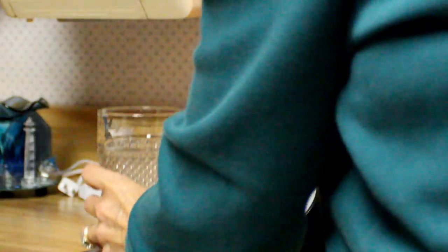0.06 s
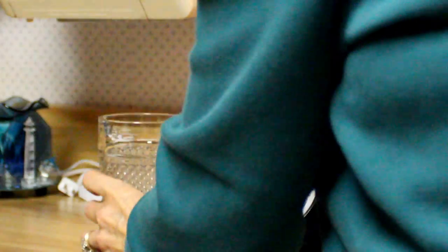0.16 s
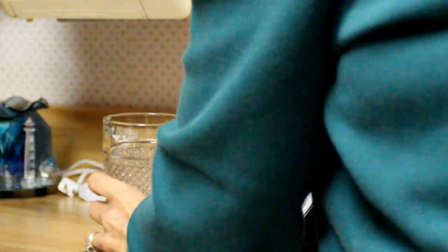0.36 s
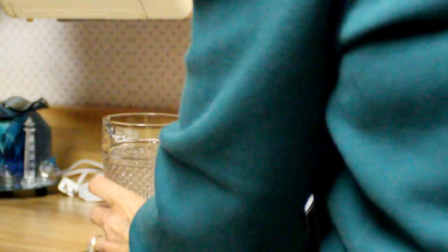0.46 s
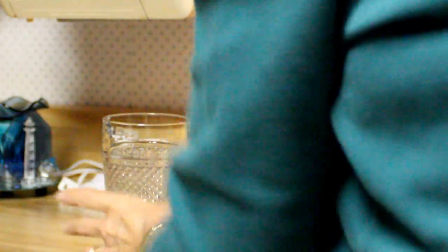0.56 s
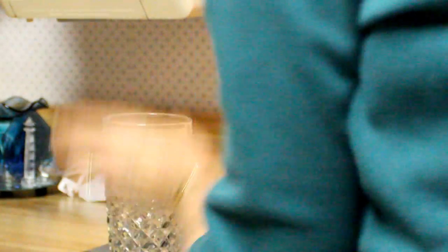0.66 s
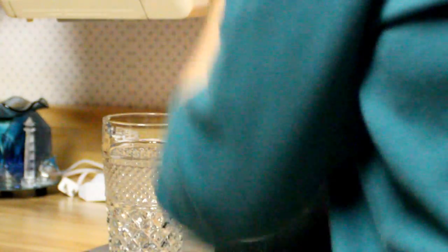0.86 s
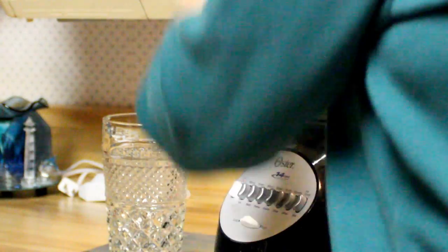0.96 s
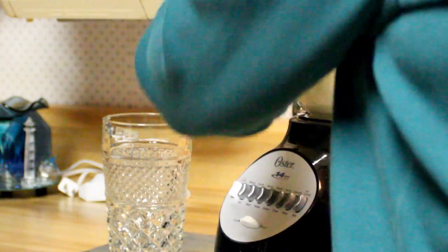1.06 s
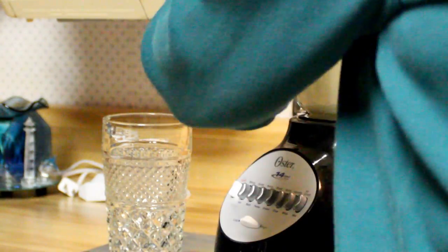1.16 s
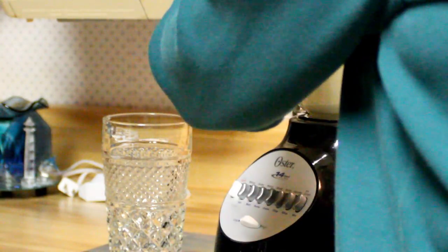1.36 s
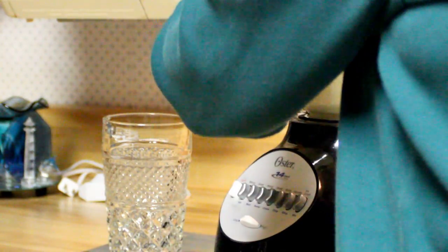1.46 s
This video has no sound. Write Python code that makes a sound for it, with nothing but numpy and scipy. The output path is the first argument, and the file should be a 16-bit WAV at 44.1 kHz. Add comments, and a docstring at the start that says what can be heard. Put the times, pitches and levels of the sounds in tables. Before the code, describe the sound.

A heavy glass tumbler knocks down on a wooden counter, hard and clattery, in a kitchen

```python
"""Kitchen, one microphone, 1.5 s: faint mains hum and converter hiss throughout, a sleeve brushing now and then.
At 0.23 s a heavy glass tumbler meets a wooden counter in quick touches: dying sines for glass and wood,
short noise for thud and crack. Dense noise echoes ring on from hard walls, the first after 1.5 m of extra path.
The camera's gain control dips after the knock and climbs back; from 0.41 s the base settles in a soft scuff
of random slips, with the hand's weight flexing the counter."""
import sys
import numpy as np
from scipy import signal
from scipy.io import wavfile
from scipy.ndimage import uniform_filter1d

SR = 44100
rng = np.random.default_rng(int(sys.argv[2]) if len(sys.argv) > 2 else 0)


def invert_db(x):
    """Field ratio 10**(x/20) for x, a level in decibels (scalar or array-like)."""
    u = np.asarray(x, float) / 20
    return 10 ** u


def inscribe(sig):
    """Save sig as 16-bit PCM at rate SR to the path in sys.argv[1].

    A 1-D sig is mono; a 2-D sig holds one channel per row.
    Samples are clipped to [-1, 1] before scaling.
    """
    pcm = np.round(np.clip(np.atleast_2d(sig).T, -1, 1) * 32767)
    wavfile.write(sys.argv[1], SR, pcm.astype(np.int16))


N = 66150

# touches of the base, edge first: [t/s, force level/dB, contact cut-off f/Hz]
TOUCHES = [(0.2333, -12, 2500), (0.2353, -2, 4000), (0.2393, -4, 6500), (0.2414, -3.5, 4400),
           (0.2445, -11.5, 3500), (0.2493, -8.5, 3500), (0.2525, -13.5, 3500), (0.288, -12, 2000)]
# glass and counter top ringing together: [f/Hz, relative level/dB, t60/s]
GLASS_AND_TOP_MODES = [(694, -7.5, 0.058), (826, -8, 0.059), (1040, -2.5, 0.059), (1150, -14, .05),
                       (1249, -10.5, 0.068), (1340.4, -3.5, 0.046), (1415, -8.5, 0.052), (1535, -1, .045),
                       (1791, -9.5, 0.12), (2020, -8, 0.072), (2158, -12, 0.12), (2306, -7.5, 0.043),
                       (2635, -10.5, 0.075), (2946, -8, 0.05), (3423, -11.5, 0.058), (3640, -13, 0.035),
                       (3928, -12.5, 0.043), (4410, -19, 0.1), (4620, -12, 0.059), (5210, -17.5, 0.046),
                       (5835, -32, 0.14), (6500, -29, 0.046), (8400, -42, .08)]
# counter and cabinet below: [f/Hz, relative level/dB, t60/s]
CABINET_MODES = [(56.2, -33.5, 0.45), (108, -22.5, .1), (157, -17, 0.06), (200, -34, .15),
                 (256.5, -20.5, 0.2), (326, -23, 0.23), (390, -24, .08), (435, -19, .15),
                 (525, -9.5, 0.033), (561, -18.5, 0.25)]
# thin ring of the glass wall: [f/Hz, relative level/dB, t60/s]
GLASS_WALL_MODES = [(804, -22.5, 0.5), (4608, -30, .3), (1030, -22, .3), (2030, -26, .3), (5230, -35, .3),
                    (5620, -28, 0.39), (5850, -38, .25), (7741, -39, .3), (8500, -43, .25)]
# scuff of the settling base: [t/s, force level/dB]
SETTLE = [(0.405, -62), (0.428, -44), (0.443, -33.5), (0.455, -42), (0.475, -54), (0.54, -62)]
# kitchen reverberation: [f/Hz, t60/s, relative level/dB]
KITCHEN = [(60, .6, -8.5), (149, 0.69, -4.5), (308, 0.68, 1), (600, 0.55, -4.5), (1200, 0.44, -6),
           (2500, .44, -5), (5000, 0.38, -6.5), (9000, 0.28, -7), (14400, 0.085, -19)]
# sleeve brushing as the arm moves: [t/s, level/dB]
SLEEVE = [(0.0, -75), (0.09, -64), (0.2, -66), (0.5, -75), (0.85, -70), (0.97, -61), (1.06, -68),
          (1.3, -75), (1.5, -70)]
# mains hum: [f/Hz, mean rms level/dB]
HUM = [(118.4, -68), (242.2, -79.5), (360.7, -71.5)]
# colour of the converter hiss: [f/Hz, relative level per Hz/dB]
HISS = [(15, -49), (25, -12), (90, -13), (103, -4.5), (124, -20), (149, -10), (194, -4), (331, -12),
        (443, -7), (862, -12.5), (1590, -13), (14500, -25)]

RING_DB = -5
CRACK_DB, CRACK_DECAY_S, CRACK_LOW_HZ, CRACK_HIGH_HZ = -29, 0.003, 5050, 9740
THUD_DB, THUD_DECAY_S, THUD_LOW_HZ, THUD_HIGH_HZ = -9.5, 0.0091, 300, 4000
SLIPS_PER_S, SLIP_CUT_HZ = 3000, 2800
PUSH_DB, PUSH_CUT_HZ = 18, 200
RING_ECHO_DB, THUD_ECHO_DB = -2.5, 4.5  # sent toward the walls
FIRST_ECHO_S, ECHO_BUILD_S = 0.0045, 0.006
HUM_WAVER_DB = 1.5
HISS_DB, HISS_TOP_HZ = -55, 14560  # rms level, upper edge
MIC_LOW_HZ, OVERLOAD = 44, 1.6  # bass roll-off, ceiling of the rounded peaks
LIMIT_DB, CUT_DB_PER_DB_OVER = -21, 0.62
REACT_S, SMOOTH_S, RECOVER_DB_PER_S = 0.02, 0.0023, 64.5


def soften(x, cut_hz):
    """Low-pass: a softer contact passes less treble."""
    sos = signal.butter(2, np.clip(cut_hz, 50, .45 * SR), fs=SR, output="sos")
    return signal.sosfilt(sos, x)


def noise_band(low_hz, high_hz, order=1):
    """White noise limited to one band."""
    sos = signal.butter(order, [low_hz, high_hz], "band", fs=SR, output="sos")
    return signal.sosfilt(sos, rng.standard_normal(N))


def ring(force, modes):
    """Every mode answers the force with a dying sine, signs alternating."""
    out = 0
    for k, (hz, level_db, t60) in enumerate(modes):
        radius = invert_db(-60 / (t60 * SR))
        angle = 2 * np.pi * hz / SR
        poles = [1, -2 * radius * np.cos(angle), radius * radius]
        mode = signal.lfilter([0, np.sin(angle)], poles, force + 1e-18)
        out = out + (-1) ** k * invert_db(level_db) * mode
    return out


def landing_force():
    """Each touch is an impulse of force, softened by its contact."""
    force = np.zeros(N)
    for start_s, force_db, cut_hz in TOUCHES:
        impulse = np.zeros(N)
        impulse[int(start_s * SR)] = 1
        force += invert_db(force_db) * soften(impulse, cut_hz)
    return force


def landing_crack():
    """Each touch adds a short bright burst of noise, louder for harder contacts."""
    t, level = np.arange(N) / SR, np.zeros(N)
    for start_s, force_db, cut_hz in TOUCHES:
        decay = (t >= start_s) * np.exp(-np.abs(t - start_s) / CRACK_DECAY_S)
        level += invert_db(force_db) * (cut_hz / CRACK_LOW_HZ) ** 2 * decay
    return invert_db(CRACK_DB) * level * soften(noise_band(CRACK_LOW_HZ, CRACK_HIGH_HZ), 15000.0)


def settling_slips():
    """The scuff: tiny random slips of the base against the wood."""
    s, level_db = np.transpose(SETTLE)
    envelope = invert_db(np.interp(np.arange(N) / SR, s, level_db, -120, -120))
    return (rng.random(N) < SLIPS_PER_S / SR) * rng.standard_normal(N) * envelope


def board_thud(force):
    """The board's many close modes: a broad thud that dies fast, different in each direction."""
    signs = rng.choice([-1, 1], N // 64 + 1)[np.arange(N) // 64]  # redrawn every 64 samples
    noise = soften(noise_band(THUD_LOW_HZ, THUD_HIGH_HZ), 5500.0)
    response = noise * np.exp(-np.arange(N) / SR / THUD_DECAY_S)
    return invert_db(THUD_DB) * signal.fftconvolve(force * signs, response)[:N]


def tumbler():
    """Touches and slips drive modes and four thuds; the hand's weight adds a low push while settling."""
    slips = settling_slips()
    force = landing_force() + soften(slips, SLIP_CUT_HZ)
    thuds = [board_thud(force) for _ in range(4)]
    push = invert_db(PUSH_DB) * soften(soften(slips, PUSH_CUT_HZ), PUSH_CUT_HZ)
    modes = ring(force, CABINET_MODES + GLASS_AND_TOP_MODES + GLASS_WALL_MODES)
    return invert_db(RING_DB) * modes + landing_crack() + push, thuds


def table(rows, hz, column):
    """Reads a column at a frequency, interpolating over log frequency."""
    rows = np.array(rows)
    return np.interp(np.log(hz), np.log(rows[:, 0]), rows[:, column])


def bands(count):
    """Half-octave noise bands, neighbours unrelated; yields (centre f/Hz, noise)."""
    edges = 22 * 2 ** (np.arange(count + 1) / 2)
    white = rng.standard_normal((2, N))
    for k, (low, high) in enumerate(zip(edges, edges[1:])):
        sos = signal.butter(2, [low, high], "band", fs=SR, output="sos")
        yield np.sqrt(low * high), signal.sosfilt(sos, white[k % 2])


def kitchen(x):
    """Dense echoes: noise that swells after the first reflection and dies band by band."""
    t = np.maximum(np.arange(N) / SR - FIRST_ECHO_S, 0)
    echoes = 0
    for hz, noise in bands(count=19):
        level_db = table(KITCHEN, hz, 2) - 60 * t / table(KITCHEN, hz, 1)
        echoes = echoes + noise * invert_db(level_db)
    swell = 1 - np.exp(-t / ECHO_BUILD_S)  # silent until the first echo
    return signal.fftconvolve(x, echoes * swell / np.sqrt(SR / 100))[:N]


def sleeve():
    """Soft cloth noise that comes and goes with the arm."""
    s, level_db = np.transpose(SLEEVE)
    cloth = noise_band(400.0, 3000.0, order=3)
    return invert_db(np.interp(np.arange(N) / SR, s, level_db)) * cloth / cloth.std()


def mains_hum():
    """Steady sines whose levels waver slowly."""
    t, hum = np.arange(N) / SR, 0
    for hz, level_db in HUM:
        waver = np.interp(t, np.arange(14) / 8, rng.standard_normal(14))  # a new value 8 times a second
        level = np.sqrt(2) * invert_db(level_db + HUM_WAVER_DB * waver)
        hum = hum + level * np.sin(2 * np.pi * (hz * t + rng.random()))
    return hum


def converter_hiss():
    """Steady coloured noise, cut steeply on top."""
    noise = sum(v * invert_db(table(HISS, hz, 1)) for hz, v in bands(count=19))
    noise = signal.sosfilt(signal.cheby2(16, 40, HISS_TOP_HZ, fs=SR, output="sos"), noise)
    return invert_db(HISS_DB) * noise / noise.std()


def gain_control(x):
    """Cuts the gain shortly after a loud sound and lets it climb back at a steady rate."""
    t = np.arange(N) / SR
    level_db = 10 * np.log10(uniform_filter1d(x ** 2, size=220) + 1e-12)
    wanted_db = CUT_DB_PER_DB_OVER * np.maximum(level_db - LIMIT_DB, 0)
    climb_db = RECOVER_DB_PER_S * t
    cut_db = np.maximum.accumulate(wanted_db + climb_db) - climb_db  # holds peaks, falls linearly
    late_cut_db = np.interp(t - REACT_S, t, cut_db)
    r = np.exp(-1 / (SMOOTH_S * SR))
    return x * invert_db(-signal.lfilter([1 - r], [1, -r], late_cut_db))


def scene():
    """At the microphone: one thud arrives direct, the other three by the walls only."""
    modes, thuds = tumbler()
    direct = modes + thuds[0]
    echoes = invert_db(RING_ECHO_DB) * kitchen(direct)
    echoes = echoes + invert_db(THUD_ECHO_DB) * sum(kitchen(v) for v in thuds[1:])
    return (direct + echoes + sleeve() + mains_hum())[None]


def top_cut(x):
    """Nothing passes above the cut-off."""
    return signal.sosfilt(signal.butter(12, 15610, fs=SR, output="sos"), x)


def record(dry):
    """Microphone bass roll-off, gain control, rounded peaks, then hiss."""
    mic = signal.sosfilt(signal.butter(2, MIC_LOW_HZ, "high", fs=SR, output="sos"), dry[0])
    levelled = gain_control(mic)
    rounded = OVERLOAD * np.tanh(levelled / OVERLOAD)
    mix = (rounded + converter_hiss())[None]
    return top_cut(mix)


dry = scene()
out = record(dry)
inscribe(out)
```